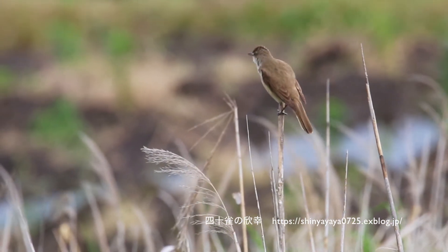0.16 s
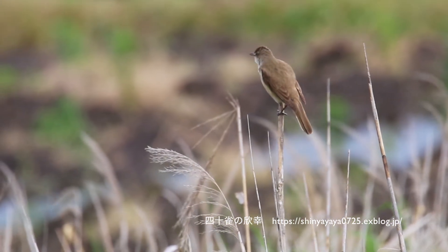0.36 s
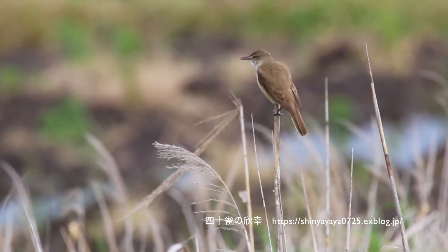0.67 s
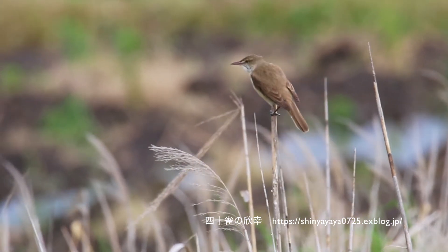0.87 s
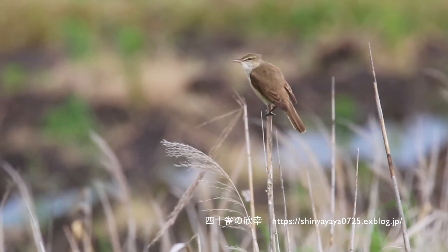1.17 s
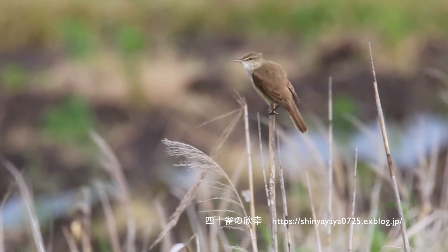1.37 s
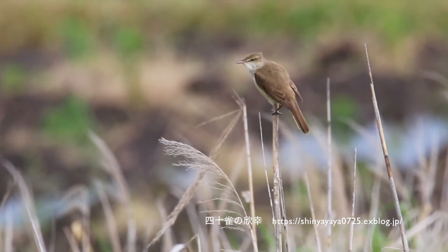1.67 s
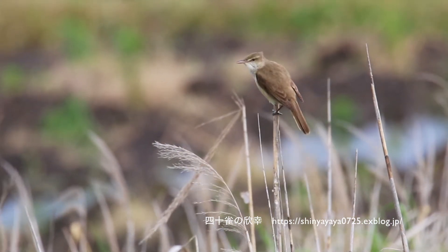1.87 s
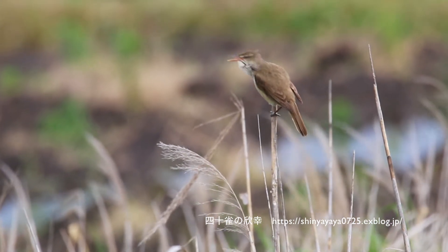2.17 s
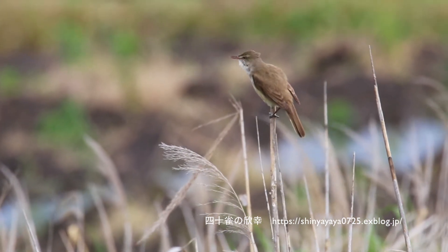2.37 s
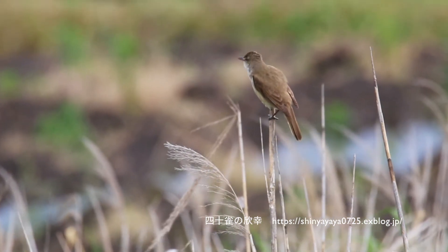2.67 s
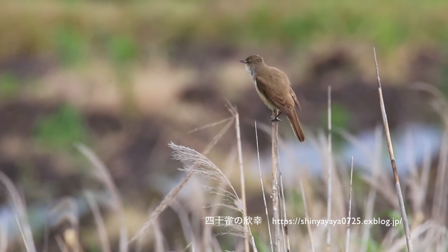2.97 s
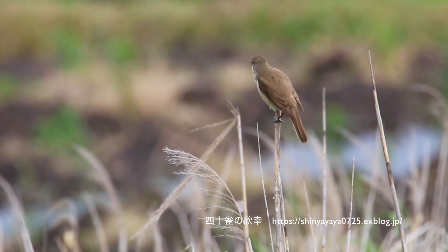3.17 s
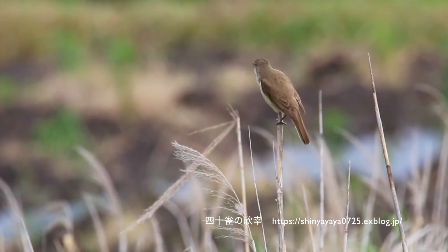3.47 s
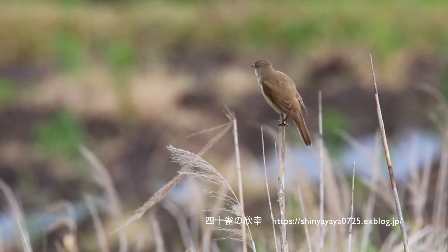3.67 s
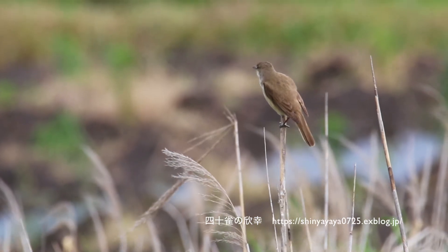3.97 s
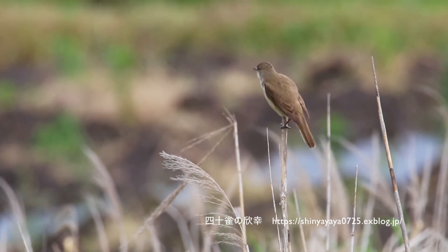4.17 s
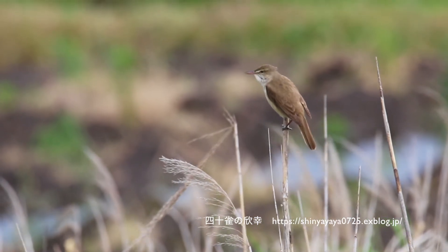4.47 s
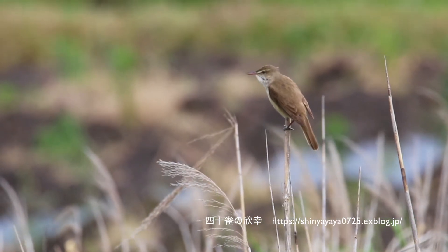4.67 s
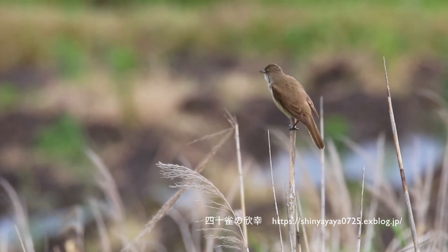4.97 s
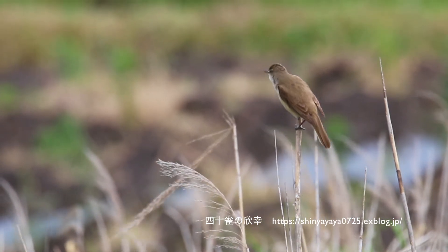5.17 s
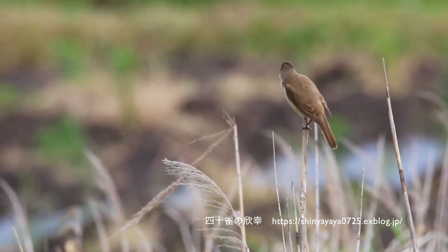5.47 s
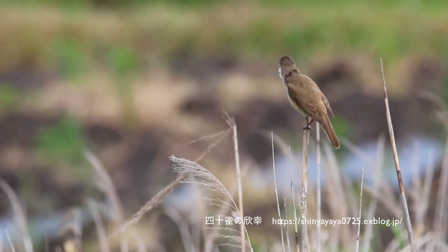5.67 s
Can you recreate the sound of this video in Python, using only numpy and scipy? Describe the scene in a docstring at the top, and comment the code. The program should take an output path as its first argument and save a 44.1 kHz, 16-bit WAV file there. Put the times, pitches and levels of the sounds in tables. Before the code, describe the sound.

A near warbler, left of centre, gives squeaks, a brief whistle, scooped calls and paired croaks, then rapid triple ticks and a burst of harsh grating notes. After a short lull, a rival on the right chatters in rough buzzes. Thin peeps and distant chatter surround them. Outdoor stereo microphone in a wetland, with short reedy echoes, faint engine hum, airy hiss and low wind buffets.

```python
'''Reed warblers in a wetland

A near warbler, left, sings harsh rattling syllables, one whistle and a run of triple ticks.
A rival answers from the right; other small birds give thin notes and trills, more warblers chatter far off.
Voices are syrinx tones scattered in pitch and chopped by a rattle; ticks are short rasps with a tone in them.
The reed bed scatters the song through a sparse noise echo; one dull knock sounds early on.
Beneath: wavering engine tones, low-frequency wind buffets and shaped-noise air.'''
import sys
import numpy as np
from scipy import signal
from scipy.fft import rfft, irfft, next_fast_len
from scipy.io import wavfile
from scipy.ndimage import uniform_filter1d

SR = 44100
rng = np.random.default_rng(int(sys.argv[2]) if len(sys.argv) > 2 else 0)


def transcribe(signal):
    """Save signal, clipped to [-1, 1], as a 16-bit WAV file at the path in sys.argv[1]."""
    frames = np.atleast_2d(signal).T
    limited = np.clip(frames, -1, 1)
    pcm = np.round(limited * 32767).astype(np.int16)
    wavfile.write(sys.argv[1], SR, pcm)


N = 257103  # length in samples


def gain_of(db):
    """Decibels to amplitude."""
    return 10 ** (np.asarray(db) / 20)


def evened(x):
    """Scales to rms 1."""
    return x / np.sqrt(np.mean(abs(x) ** 2) + 1e-20)


def read(points, hz):
    """Interpolates a table on a log-frequency axis."""
    f, value = np.transpose(points)
    return np.interp(np.log(hz + 1), np.log(f + 1), value)


def add(mix, start_s, sound):
    """Mixes a sound in at start_s."""
    part = mix[..., max(round(start_s * SR), 0):][..., :sound.shape[-1]]
    part += sound[..., :part.shape[-1]]


def wander(n, hz):
    """Smooth random motion, low-passed near hz, rms 1 before trimming to n samples."""
    size = next_fast_len(n + 4096)
    f = np.fft.rfftfreq(size, 1 / SR)
    lowpass = 1 / np.sqrt(1 + (f / hz) ** 8)
    return evened(irfft(rfft(rng.standard_normal(size)) * lowpass, size))[:n]


def gate(t, rise_s, fall_s):
    """Soft sine-squared opening and closing of a note."""
    ramp = np.minimum(t / rise_s, (t[-1] - t) / fall_s)
    return np.sin(np.pi / 2 * np.clip(ramp, 0, 1)) ** 2


def glide(t, values, margin=0.1257):
    """Parabola through a note's early, middle and late values, held flat at both ends."""
    curve = np.polyfit([margin, .5, 1 - margin], values, 2)
    return np.polyval(curve, np.clip(t / t[-1], margin * .8, 1 - margin * .8))


# syllable voicings, pitch and level against the syllable's middle: (kind, early_pitch_ratio,
# late_pitch_ratio, early_db, late_db, rasp_hz, undertone_db, rattle_hz, rattle_depth [0-1])
VOICINGS = [("growl", 1.01, 1.02, -5, 2.1, 345, -35, 112.6, 0.59),
            ("bark", 1.05, 0.94, 2.1, -1.3, 328, -20.5, 208, 0.39),
            ("grate", 1.04, .98, .4, -.4, 430, -15, 145, 0.46),
            ("croak", 1.11, .93, 0.56, -2, 407, -26.5, 265.7, 0.24),
            ("chuck", 0.9, 0.92, -3.2, -2, 325, -17.5, 199.5, 0.29),
            ("upsweep", 1, 1.21, -9, -2, 420, -16, 193, 0.3),
            ("squeak", 0.97, 0.94, 1.2, .3, 400, -12.5, 300, .62),
            ("dip", 1.19, 1.07, -4, -.5, 310, -18, 206, .48),
            ("flick", .92, 1.04, .5, -2, 195, -19.5, 200, 0.3),
            ("whistle", 0.94, 0.97, -8.5, 3, 22, -26, 180, 0.2)]
# slow swelling rattles: (start_s, length_s, pitch_hz, level_db, bird)
GROWL_NOTES = [(2.068, 0.0736, 2847, -22, "near"), (2.226, .029, 2407, -27.5, "near"),
               (2.422, 0.043, 2560, -27, "near"), (2.622, 0.054, 2494, -27, "near"),
               (3.135, 0.034, 3150, -37, "rival"), (4.372, .03, 2850, -32.5, "rival"),
               (4.55, .048, 2657, -32, "rival"), (4.92, 0.062, 2884, -31.5, "rival"),
               (5.138, 0.0354, 2747, -31, "rival")]
# buzzes, hard start, sagging: (start_s, length_s, pitch_hz, level_db, bird)
BARK_NOTES = [(2.168, 0.056, 2810, -33.5, "rival"), (2.481, 0.049, 2986, -20, "near"),
              (2.687, 0.056, 3045, -21.2, "near"), (3.174, 0.013, 3200, -28.5, "rival"),
              (4.424, 0.055, 2980, -29, "rival"), (4.621, 0.059, 3037, -29.5, "rival"),
              (4.686, .039, 3230, -41, "rival"), (4.885, 0.028, 3170, -38.5, "rival"),
              (4.999, 0.058, 2995, -29.5, "rival"), (5.195, 0.06, 3095, -30, "rival"),
              (5.26, .05, 2950, -32, "near")]
# harshest notes: (start_s, length_s, pitch_hz, level_db, bird)
GRATE_NOTES = [(2.257, 0.017, 2626, -20.5, "near"), (2.288, 0.047, 2823, -18, "near"),
               (2.341, 0.025, 2394, -20.5, "near")]
# harsh, falling: (start_s, length_s, pitch_hz, level_db, bird)
CROAK_NOTES = [(.193, 0.026, 2700, -32, "near"), (.216, 0.017, 2057, -27.5, "near"),
               (.98, 0.0376, 2428, -22, "near"), (1.028, 0.034, 2407, -24, "near"),
               (1.275, 0.029, 2394, -20.5, "near"), (1.324, 0.031, 2510, -21.5, "near"),
               (1.503, 0.03, 3205, -33.5, "near"), (5.46, 0.037, 2840, -36, "rival"),
               (5.752, 0.027, 2280, -26, "near")]
# short, throaty: (start_s, length_s, pitch_hz, level_db, bird)
CHUCK_NOTES = [(.305, 0.015, 2630, -19, "near"), (.916, 0.036, 2370, -35.5, "near"),
               (3.545, 0.02, 2610, -39, "rival"), (3.582, 0.024, 2380, -28, "rival"),
               (3.618, 0.013, 1730, -33.5, "rival"), (3.945, .024, 2900, -38, "rival"),
               (3.979, 0.028, 2713, -27.5, "rival"), (4.017, 0.022, 1890, -35, "rival"),
               (4.043, .027, 2430, -42, "rival"), (5.5, 0.011, 2600, -27.5, "rival"),
               (5.603, 0.058, 2460, -29.5, "near"), (5.787, 0.03, 2383, -21.5, "near")]
# quick rises ahead of paired croaks: (start_s, length_s, pitch_hz, level_db, bird)
UPSWEEP_NOTES = [(.959, 0.0145, 2115, -27.5, "near"), (1.253, .017, 2250, -25, "near")]
# high, hissing: (start_s, length_s, pitch_hz, level_db, bird)
SQUEAK_NOTES = [(.015, .03, 5330, -32.5, "near"), (.06, .03, 5400, -34, "near"),
                (.725, .03, 5420, -41.5, "near"), (.77, 0.031, 5530, -38.5, "near"),
                (5.57, 0.082, 5450, -52, "rival")]
# the one pure, swelling whistle: (start_s, length_s, pitch_hz, level_db, bird)
WHISTLE_NOTES = [(.253, 0.0565, 2694, -20.5, "near")]
# V-shaped calls, rough dip then clear flick: (start_s, dip_length_s, pitch_hz, level_db, bird)
SCOOP_NOTES = [(.493, .034, 2880, -20, "near"), (.601, .039, 2854, -20.2, "near")]
FLICK_S, FLICK_PITCH_RATIO, FLICK_DB = 0.0166, 1.245, 1.5  # pitch and level against the dip
RIVAL_RATTLE_RATIO = 1.11


def song(bird):
    """One warbler's syllables; kind sets pitch bend, swell and roughness, the rival rattles faster."""
    flicks = [(start_s + length_s, FLICK_S, hz * FLICK_PITCH_RATIO, db + FLICK_DB, who)
              for start_s, length_s, hz, db, who in SCOOP_NOTES]
    notes = dict(growl=GROWL_NOTES, bark=BARK_NOTES, grate=GRATE_NOTES, croak=CROAK_NOTES,
                 chuck=CHUCK_NOTES, upsweep=UPSWEEP_NOTES, squeak=SQUEAK_NOTES,
                 dip=SCOOP_NOTES, flick=flicks, whistle=WHISTLE_NOTES)
    out = np.zeros(N)
    pace = RIVAL_RATTLE_RATIO if bird == "rival" else 1
    for kind, early, late, early_db, late_db, rasp_hz, undertone_db, rattle_hz, depth in VOICINGS:
        for start_s, length_s, hz, db, who in notes[kind]:
            if who == bird:
                pitches_hz = [hz * early, hz, hz * late]
                levels_db = [db + early_db, db, db + late_db]
                add(out, *syllable(start_s, length_s, pitches_hz, levels_db,
                                   rasp_hz, undertone_db, rattle_hz * pace, depth))
    return out


def syllable(start_s, length_s, pitches_hz, levels_db, rasp_hz, undertone_db, rattle_hz, depth,
             scatter_hz=760, spread=2.25, unevenness=0.32, stutter_db=2.5, overtone_db=-29,
             breath_db=-13, quarter_db=-13, spray_db=-31.5, rise_s=0.0019, rise_s_per_db=0.00036):
    """Syrinx tone: chaotic vibration scatters pitch, rattle chops, period doubling adds an undertone."""
    t = np.arange(int((length_s + 0.0032) * SR)) / SR
    n, depth = len(t), np.clip(depth, 0, 1)
    phase = 2 * np.pi * np.cumsum(glide(t, pitches_hz)) / SR
    jitter = wander(n, scatter_hz)
    jitter = evened(jitter - uniform_filter1d(jitter, size=130))  # slow drift removed
    slip = 2 * np.pi * np.cumsum(rasp_hz * jitter) / SR

    beats = np.cumsum(rattle_hz * (1 + unevenness * wander(n, rattle_hz))) / SR
    stutter = gain_of(2 * depth * stutter_db * wander(n, rattle_hz))
    rattle = (1 - depth * np.cos(2 * np.pi * beats + 1)) * stutter

    turbulence = gain_of(breath_db) * (wander(n, 2040) + 1j * wander(n, 1850))
    # lands at 5/4 of the pitch once on the carrier
    quarter = gain_of(quarter_db) * np.exp(1j * (phase + slip) / 4)
    shake = rattle * (np.exp(1j * slip) + 2 * depth * (turbulence + quarter))
    shake = evened(confine(shake, spread * rasp_hz))
    carrier = (shake * np.exp(1j * phase)).real

    undertone = gain_of(undertone_db) * np.sin((phase + slip) / 2)
    overtone = gain_of(overtone_db) * np.sin(2 * phase + slip)
    spray = gain_of(spray_db) * wander(n, 14000)
    tone = evened(carrier + rattle * (undertone + 2 * depth * (overtone + spray)))

    # notes that grow louder open more gently
    attack_s = rise_s + rise_s_per_db * max(levels_db[2] - levels_db[0], 0)
    return start_s - .001, gain_of(glide(t, levels_db)) * tone * gate(t, attack_s, 0.005)


def confine(shake, hz, leak=0.45):
    """The throat favours sidebands within hz of the tone; part of the rest leaks out."""
    size = next_fast_len(len(shake) + 512)
    passed = 1 / np.sqrt(1 + (np.fft.fftfreq(size, 1 / SR) / hz) ** 12)
    return np.fft.ifft(np.fft.fft(shake, size) * (leak + passed))[:len(shake)]


# tick spectrum: (freq_hz, rel_db)
TICK_SPECTRUM = [(1000,-18),(2400,-11.5),(3100,-3.5),(3750,-0.5),(4400,-3),(5900,-5.5),(7000,-24),(11000,-19.5),(15000,-35)]
# groups of three ticks: (middle_tick_s, rel_db)
TICK_TRIPLETS = [(1.4765, -17.5), (1.5807, -15.5), (1.6772, -15), (1.7734, -14.5), (1.87, -15),
                 (1.969, -17.5)]
# first, middle and last tick of each group: [rel_db]
ACCENTS_DB = [-3.3, 0.4, -2.5]
TICK_GAP_S, TICK_HZ = .0215, 3806


def ticks(offset_db=-8, length_s=.0105, tone_gain=0.42, pitch_spread=0.052):
    """Near warbler's dry ticks: milliseconds of coloured rasp holding a brief tone of varying pitch."""
    out, t = np.zeros(N), np.arange(int(length_s * SR)) / SR
    colour = gain_of(read(TICK_SPECTRUM, np.fft.rfftfreq(len(t), 1 / SR)))
    envelope = gate(t, 0.0026, 0.0052)
    for middle_s, db in TICK_TRIPLETS:
        for k, accent_db in enumerate(ACCENTS_DB):
            random_phase = np.exp(2j * np.pi * rng.random(len(colour)))
            rasp = evened(irfft(colour * random_phase, len(t)))
            hz = TICK_HZ * (1 + pitch_spread * rng.standard_normal())
            tick = evened(rasp + tone_gain * np.sin(2 * np.pi * hz * t)) * envelope
            start_s = middle_s + (k - 1) * TICK_GAP_S - .0015
            add(out, start_s, gain_of(db + accent_db + offset_db) * tick)
    return out


# single notes of small birds: (start_s, length_s, pitch_hz, glide_hz, rel_db, left_minus_right_db)
SINGLE_NOTES = [(.86, .03, 3730, -900, -46, 1), (1.12, .045, 5300, -200, -52.5, 9),
                (1.352, 0.028, 3500, 752, -39.5, 7), (1.608, .048, 6250, 320, -49, 9),
                (2.209, 0.052, 4700, 140, -42.5, 2), (2.378, .05, 4620, -220, -45.5, 3),
                (2.535, 0.063, 4130, -150, -46, 5), (2.462, .05, 5930, -60, -50, 7),
                (2.968, 0.0275, 4420, -500, -48, 8), (3.081, 0.029, 2485, 250, -41.5, -4),
                (3.497, 0.046, 3860, -450, -47, -1), (5.266, 0.045, 4120, 570, -43.5, 5)]
# trilled calls, arch then fall: (start_s, rel_db, final_pitch_hz)
TRILLED_CALLS = [(4.745, -32.5, 5130), (5.317, -31.5, 5390)]
# arch pitch early, midway, late: [pitch_hz]
ARCH_PITCHES_HZ = [5580, 5970, 5740]
FALL_FROM_HZ = 5530


def chirps(offset_db=-5, arch_s=0.0424, arch_db=-3, fall_after_s=0.032, fall_s=0.0382, pan_db=-5):
    """Small birds: lightly quavering single notes, and a strongly trilled call from the right."""
    out = np.zeros((2, N))
    for start_s, length_s, hz, glide_hz, db, side_db in SINGLE_NOTES:
        pitches_hz = [hz - glide_hz / 2, hz, hz + glide_hz / 2]
        add(out, start_s, chirp(length_s, pitches_hz, db, side_db, trill_hz=105, swing_hz=85))
    for start_s, db, end_hz in TRILLED_CALLS:
        arch = chirp(arch_s, ARCH_PITCHES_HZ, db + arch_db, pan_db, trill_hz=129, swing_hz=165)
        fall_hz = [FALL_FROM_HZ, (FALL_FROM_HZ + end_hz) / 2, end_hz]
        fall = chirp(fall_s, fall_hz, db, pan_db, trill_hz=130, swing_hz=135)
        add(out, start_s, arch)
        add(out, start_s + fall_after_s, fall)
    return gain_of(offset_db) * out


def chirp(length_s, pitches_hz, db, pan_db, trill_hz, swing_hz, throb=0.79):
    """Thin gliding whistle; the trill shakes both pitch and loudness."""
    t = np.arange(int(length_s * SR)) / SR
    trill = 2 * np.pi * np.cumsum(trill_hz * (1 + 0.036 * wander(len(t), 74))) / SR
    hz = glide(t, pitches_hz) + swing_hz * (np.sin(trill) + .5 * wander(len(t), 590))
    depth = np.clip(throb * swing_hz / 200, 0, .9)
    loudness = (1 - depth * np.cos(trill)) * gate(t, 0.006, 0.007)
    whistle = evened(loudness * np.sin(2 * np.pi * np.cumsum(hz) / SR))
    return gain_of(db) * whistle * gain_of([[pan_db / 2], [-pan_db / 2]])


def far_chatter(count=46, floor_db=-53):
    """Far warblers: similar syllables, random in time, pitch and side; longer ones are louder."""
    out = np.zeros((2, N))
    for k, (when, pitch, size, side) in enumerate(rng.random((count, 4))):
        hz, db = 2300 + 1100 * pitch, floor_db + 6 * size
        _, note = syllable(0, 0.031 + 0.04 * size, [hz * 0.97, hz, hz * .93], [db, db, db],
                           rasp_hz=280, undertone_db=-18, rattle_hz=170, depth=.5)
        add(out, (k + when) / count * N / SR, note * np.sqrt([[side], [1 - side]]))
    return out


def knock(start_s=.357, hz=850, level_db=-38, decay_s=0.027):
    """One soft, dull knock: a decaying tone multiplied by slow noise."""
    out, t = np.zeros(N), np.arange(SR // 16) / SR
    body = wander(len(t), 210) * np.sin(2 * np.pi * hz * t)
    add(out, start_s, gain_of(level_db) * body * np.exp(-t / decay_s))
    return out


# warbler throat resonances: (freq_hz, width_hz, boost_db)
THROAT_RESONANCES = [(1550,43,3),(2120,640,0),(2975,71,4.5),(3900,80,7),(5560,85,3.5)]
# short reflections near the microphone: (delay_s, left_gain, right_gain)
NEAR_REFLECTIONS = [(0.001909,0.35,0.12),(0.000984,-0.096,0.02),(0.0055,0.19,0.28)]


def place(x, left_db, right_db, right_lag_ms):
    """Throat colour and direction; short reflections comb the song, ripples about 500 Hz apart."""
    size = next_fast_len(N + 1024)
    f = np.fft.rfftfreq(size, 1 / SR)
    throat = 1 + sum((gain_of(db) - 1) / (1 + 2j * (f - hz) / width_hz)
                     for hz, width_hz, db in THROAT_RESONANCES)
    paths = 1 + sum(np.array([[left], [right]]) * np.exp(-2j * np.pi * f * delay_s)
                    for delay_s, left, right in NEAR_REFLECTIONS)
    paths[1] *= np.exp(-2j * np.pi * f * right_lag_ms / 1000)
    return irfft(rfft(x, size) * throat * paths, size)[:, :N] * gain_of([[left_db], [right_db]])


# decay of reed-scattered sound: (freq_hz, t60_s)
REED_DECAY = [(1000,0.074),(2700,0.54),(4000,0.81),(7000,0.13)]


def reeds(x, early_gain=4.5, early_s=0.019, onset_s=0.0055, cross=0.25):
    """Many faint echoes from stems and banks: a strong first cluster, then a fainter tail."""
    t = np.arange(SR * 3 // 4) / SR
    taps = rng.standard_normal((2, len(t))) * (rng.random((2, len(t))) < .08)
    taps *= (1 + early_gain * np.exp(-t / early_s)) * (1 - np.exp(-t / onset_s))
    hz, age_s, z = signal.stft(taps, SR, nperseg=256)
    decay = np.exp(-np.log(1000) * age_s / read(REED_DECAY, hz)[:, None])
    tail = signal.istft(z * decay, SR, nperseg=256)[1]
    tail /= np.linalg.norm(tail, axis=1, keepdims=True)
    return signal.fftconvolve((1 - cross) * x + cross * x[::-1], tail, axes=1)[:, :N]


# distant engine tones, before the left/right gains: (freq_hz, rel_db)
ENGINE_TONES = [(93.7,-58.5),(128,-57.5),(274.5,-55),(383,-61.5),(469,-61),(503,-68.5),(573,-65.5)]


def hum(drift=0.00444, flutter=0.2, left_db=-2, right_db=2.5):
    """Engine tones that waver in pitch and level on their way across the fields."""
    tones = np.zeros(N)
    for hz, db in ENGINE_TONES:
        level = 1 + flutter * wander(N, 8.3)
        phase = 2 * np.pi * np.cumsum(hz * (1 + drift * wander(N, 3.78))) / SR
        tones += gain_of(db) * evened(level * np.sin(phase))
    return tones * gain_of([[left_db], [right_db]])


# puffs of wind: (peak_s, rel_db)
WIND_GUSTS = [(.17, -45), (1.08, -38), (1.41, -45), (1.8, -48), (4.17, -42), (4.479, -37), (4.82, -39.5),
              (5.1, -37.5), (5.43, -41), (5.69, -49)]
BREEZE_REL_DB, GUST_S = -51.5, 0.057


def wind(offset_db=-2, top_hz=65):
    """Low buffeting, separate at each side of the microphone; gusts swell and die over the breeze."""
    t = np.arange(N) / SR
    power = gain_of(BREEZE_REL_DB) ** 2 + sum(
        gain_of(db) ** 2 * np.exp(-((t - peak_s) / GUST_S) ** 2) for peak_s, db in WIND_GUSTS)
    highpass = signal.butter(2, 25, "high", fs=SR, output="sos")
    buffets = signal.sosfilt(highpass, [wander(N, top_hz), wander(N, top_hz)])
    return gain_of(offset_db) * evened(buffets) * np.sqrt(power)


# still air, far traffic and hiss, spectrum shape: (freq_hz, rel_db)
AIR_SPECTRUM = [(15,-20),(35,-1),(110,2),(170,-1),(255,5),(305,-2.5),(370,1.5),(440,-5),(750,-8),(1200,-9.5),(2700,-18),(4500,-21),(7000,-23),(16000,-24)]
# left-right likeness of the air: (freq_hz, likeness [0-1])
AIR_LIKENESS = [(40,0.1),(130,0.19),(270,0.45),(600,0.13),(2500,0.5),(12000,0.07)]
# left-right balance of the air: (freq_hz, left_minus_right_db)
AIR_BALANCE = [(60,0),(130,-1),(270,-6.5),(500,-0.5),(1200,1),(12000,-0.2)]
AIR_RMS_DB = -39.5


def air(patchy_db=1.0):
    """Open-air noise: the low part drifts in patches under a smooth hiss."""
    hz = np.fft.rfftfreq(2048, 1 / SR)
    a, b, c, d, patches = rng.standard_normal((5, N // 512 + 5, len(hz)))
    patches = uniform_filter1d(patches, size=12, axis=0)  # over time
    patches = evened(uniform_filter1d(patches, size=8, axis=1))  # over frequency
    same = np.clip(read(AIR_LIKENESS, hz), -1, 1)
    left = a + 1j * b
    right = same * left + np.sqrt(1 - same ** 2) * (c + 1j * d)
    tilt_db = read(AIR_BALANCE, hz) / 2
    colour_db = read(AIR_SPECTRUM, hz) + patchy_db * patches / (1 + (hz / 5000) ** 2)
    z = np.array([left, right]) * gain_of(colour_db + np.array([tilt_db, -tilt_db])[:, None])
    noise = signal.istft(z.swapaxes(1, 2), nperseg=2048, noverlap=1536)[1][:, :N]
    return gain_of(AIR_RMS_DB) * evened(noise)


def scene():
    """Singers, their scatter in the reeds, and the background."""
    near = place(song("near") + ticks(), left_db=-2, right_db=-9.5, right_lag_ms=0.039)
    rival = place(song("rival"), left_db=-9.0, right_db=-1.64, right_lag_ms=.006)
    small, far = chirps(), far_chatter()
    scattered = reeds(gain_of(-8.5) * near + gain_of(-11.5) * rival + gain_of(-7.5) * small + far)
    singers = near + rival + small + gain_of(1.5) * far
    return singers + scattered + knock() + hum() + wind() + air()


def record(dry, edge_hz=15900):
    """Low-pass near 16 kHz, linear phase: nothing sounds above it."""
    lowpass = signal.firwin(511, edge_hz, window=("kaiser", 9), fs=SR)
    return signal.oaconvolve(dry, lowpass[None], "same")


dry = scene()
out = record(dry)
transcribe(out)
```